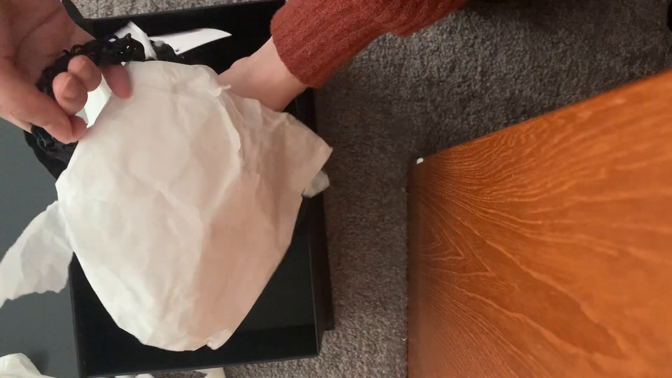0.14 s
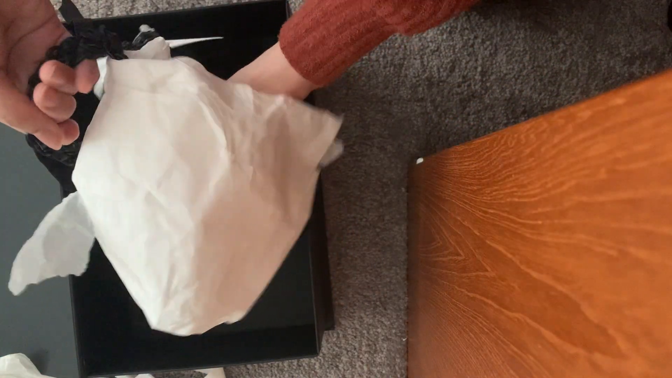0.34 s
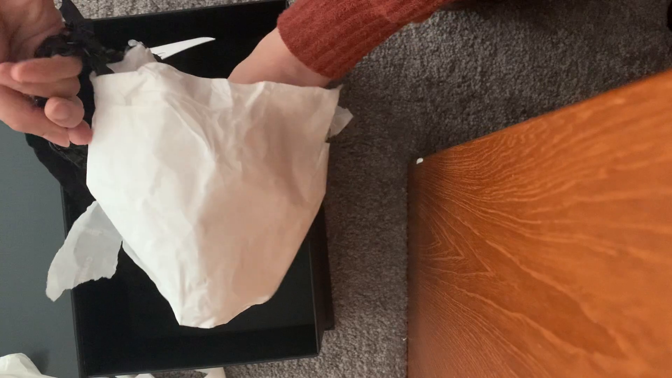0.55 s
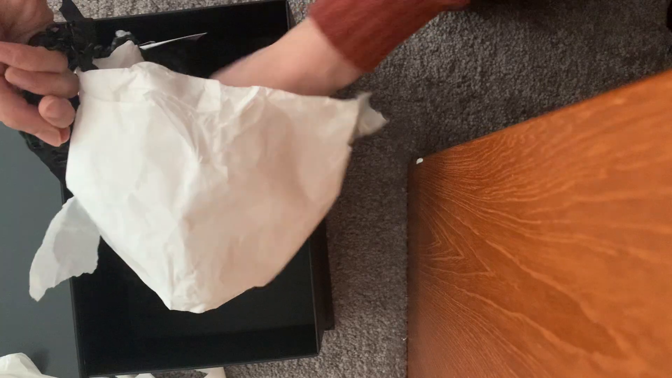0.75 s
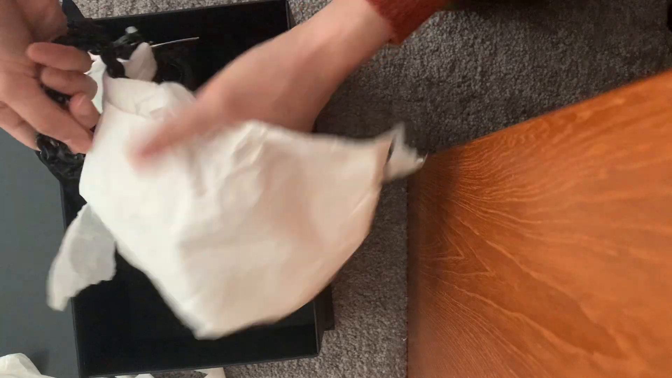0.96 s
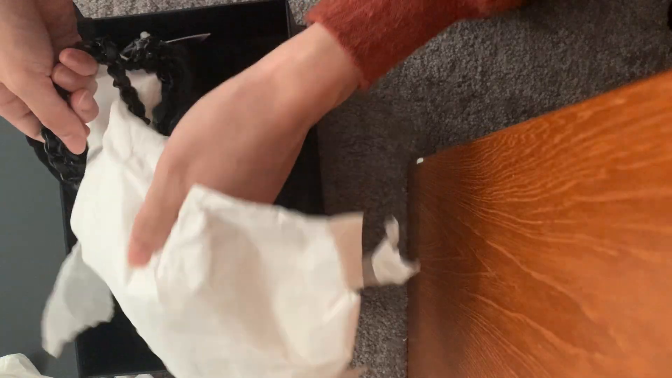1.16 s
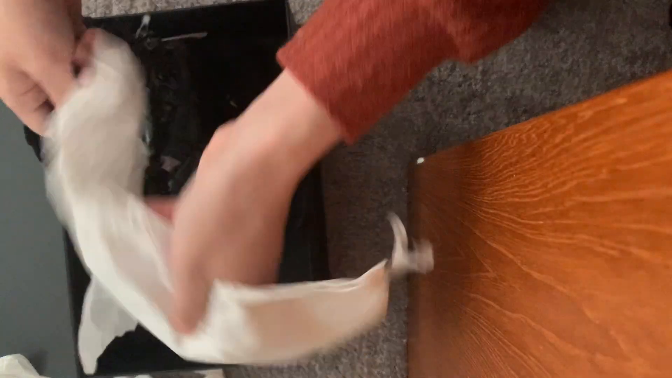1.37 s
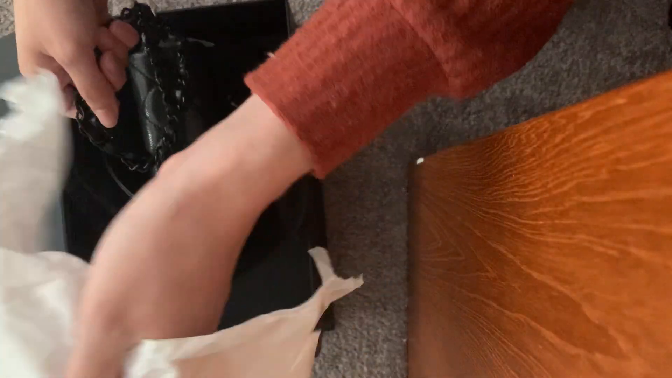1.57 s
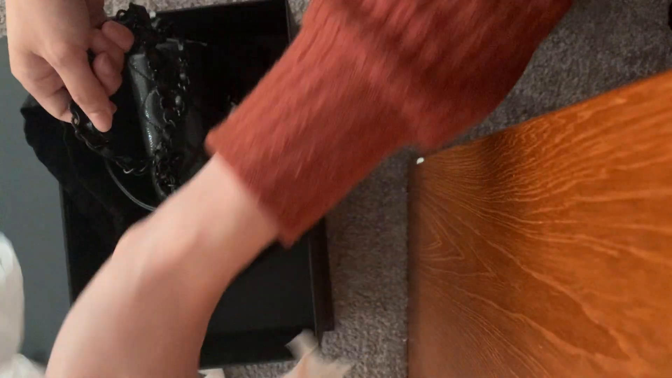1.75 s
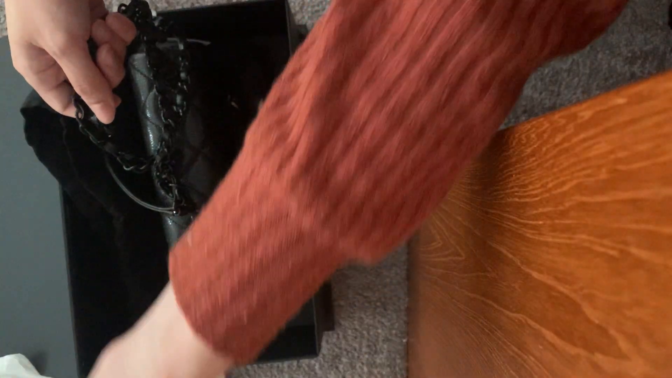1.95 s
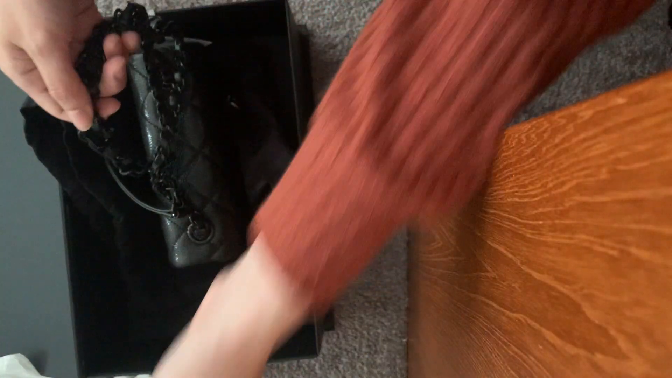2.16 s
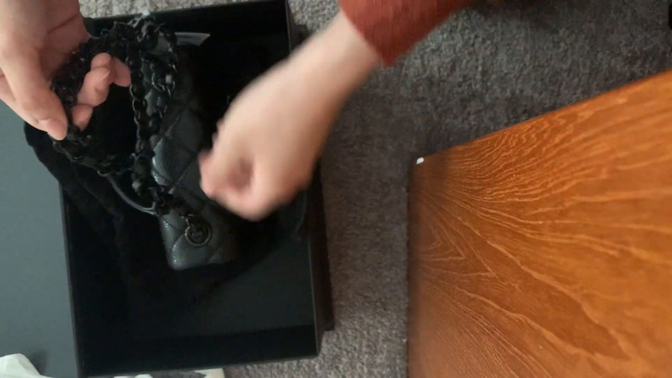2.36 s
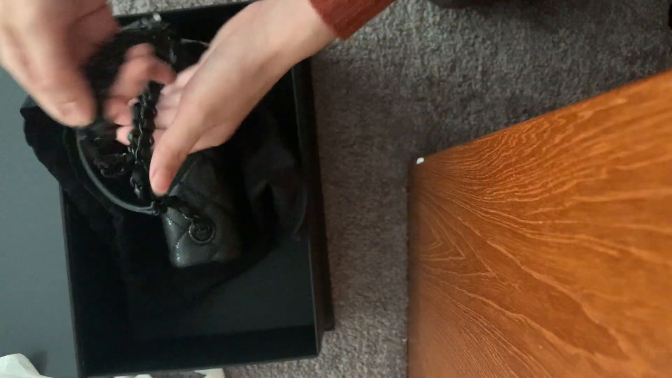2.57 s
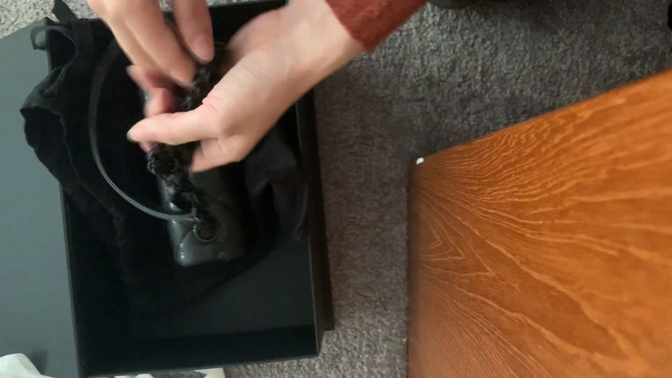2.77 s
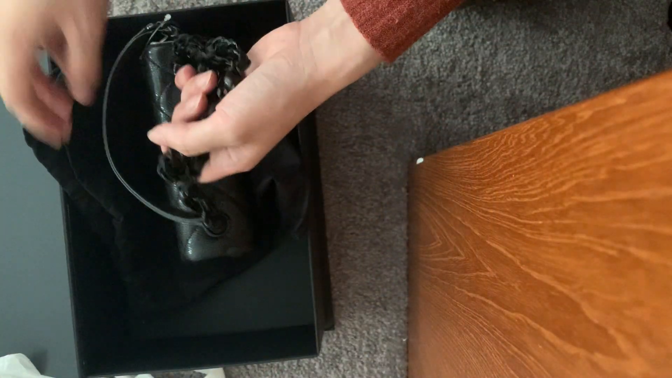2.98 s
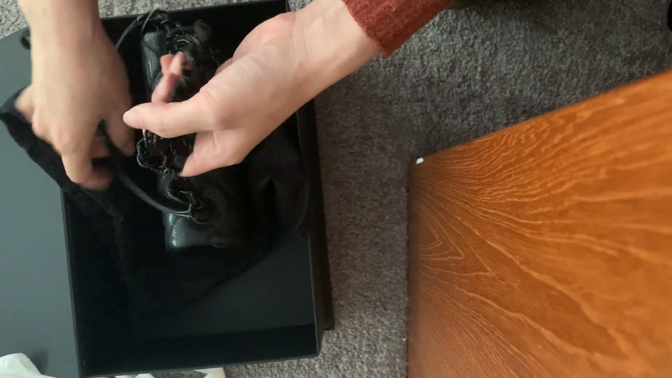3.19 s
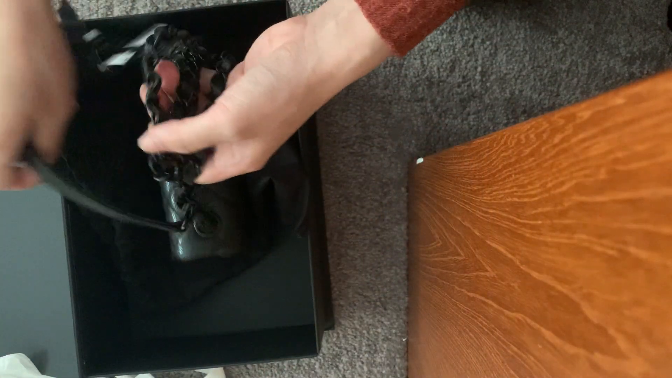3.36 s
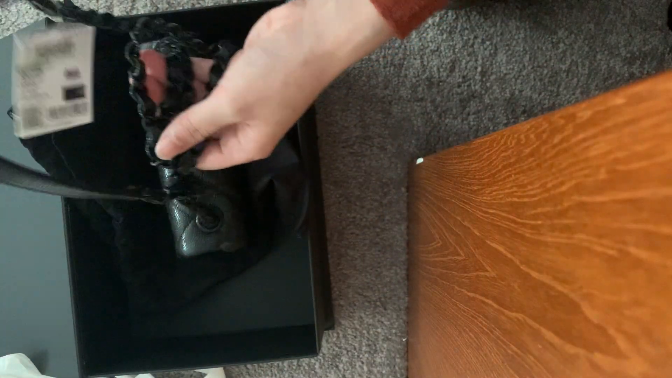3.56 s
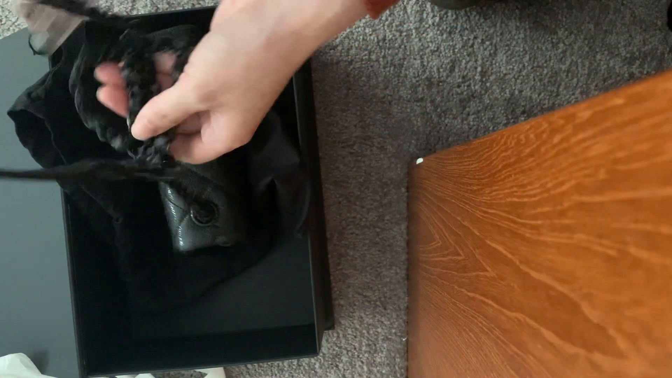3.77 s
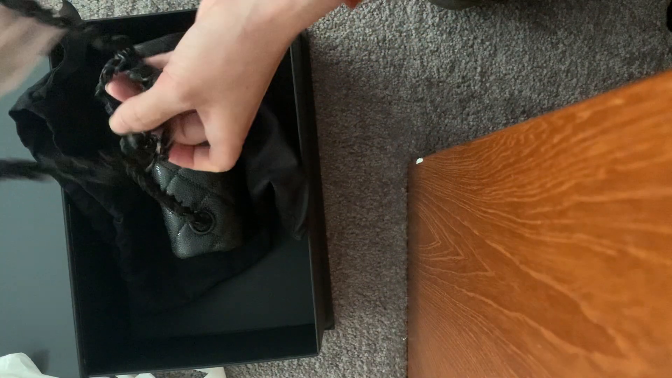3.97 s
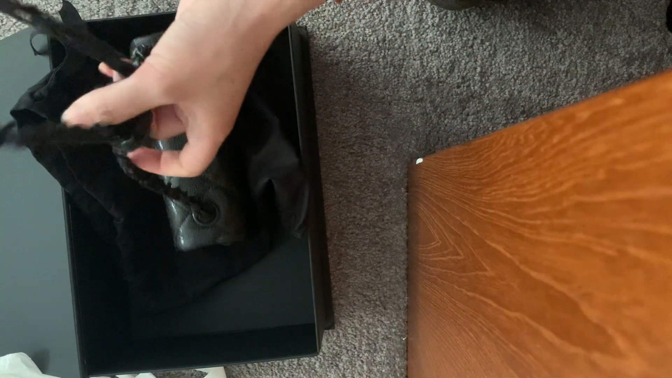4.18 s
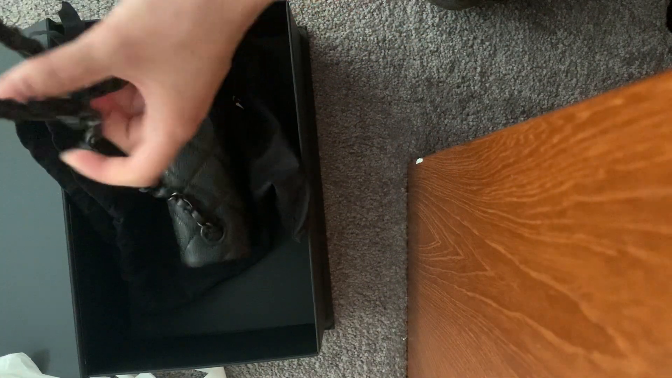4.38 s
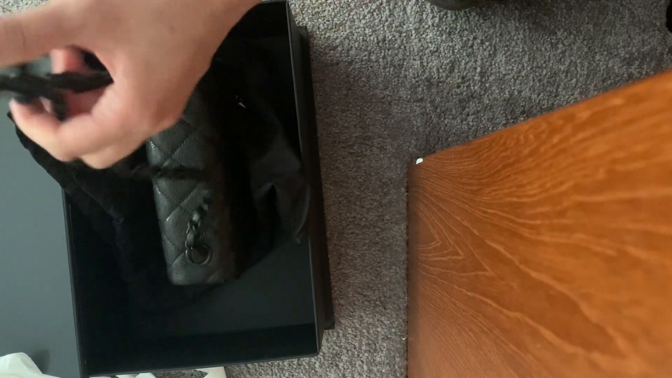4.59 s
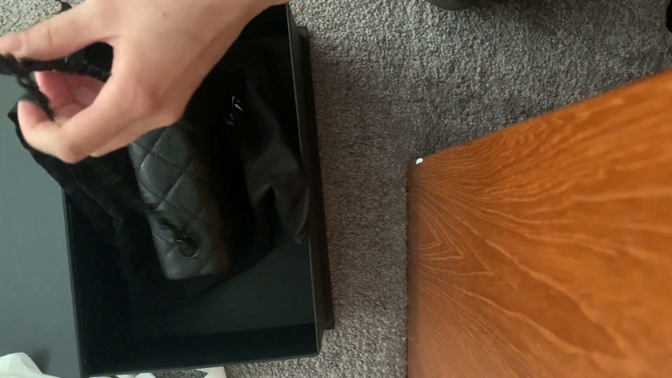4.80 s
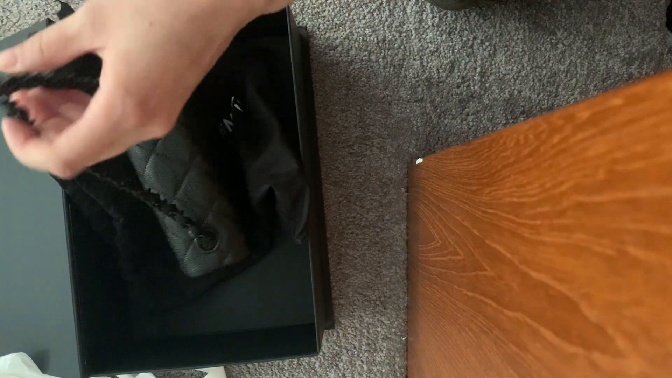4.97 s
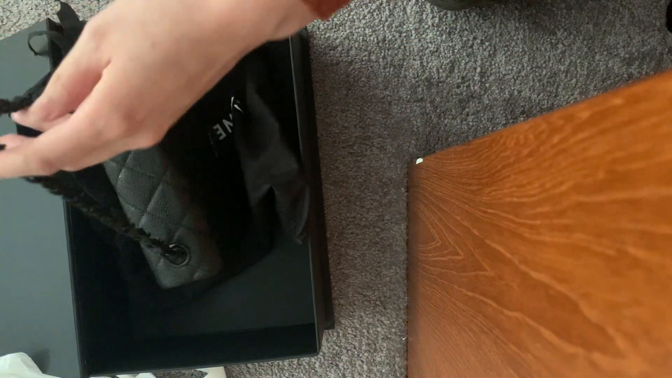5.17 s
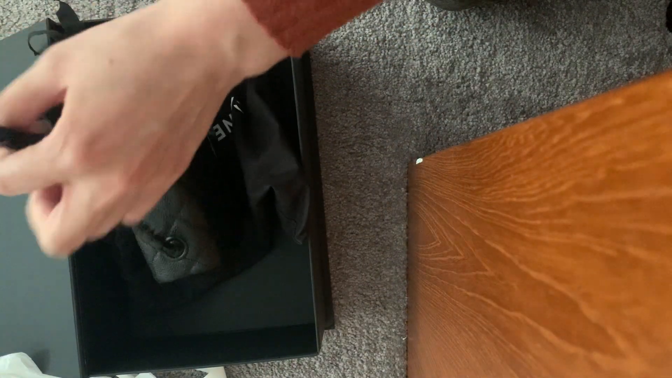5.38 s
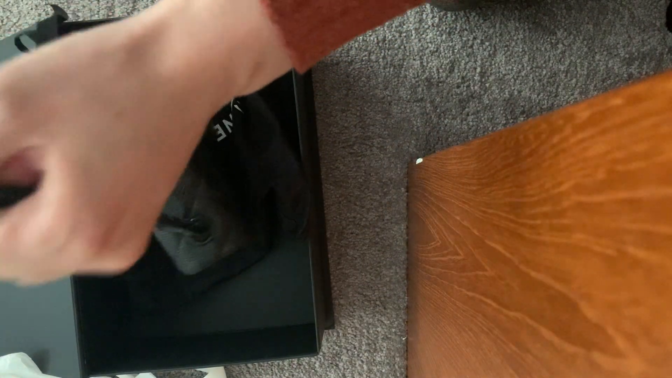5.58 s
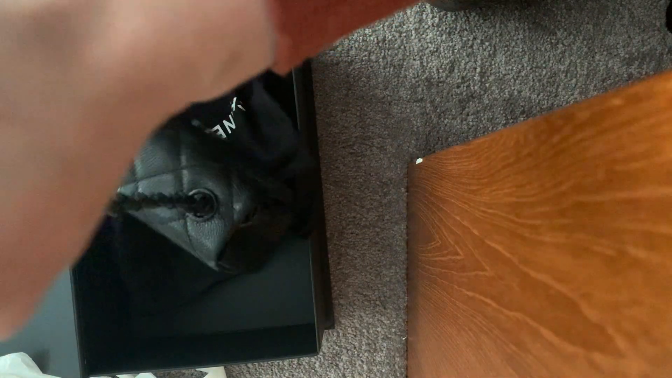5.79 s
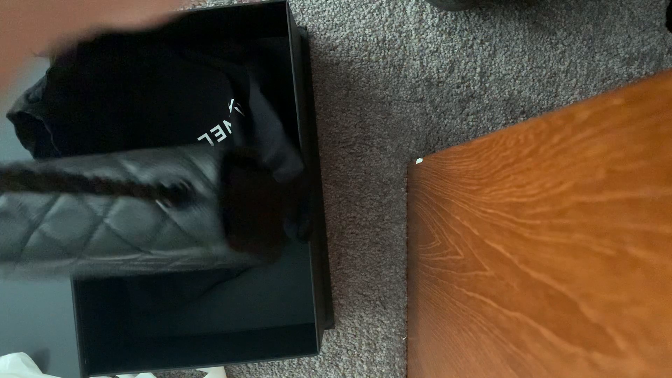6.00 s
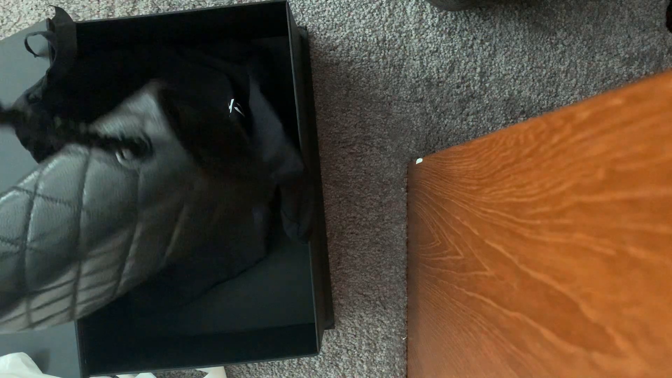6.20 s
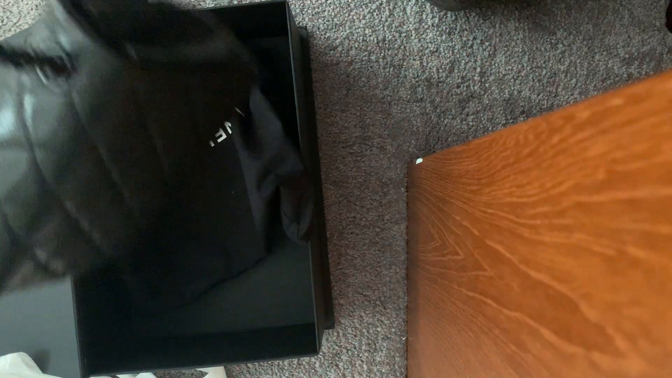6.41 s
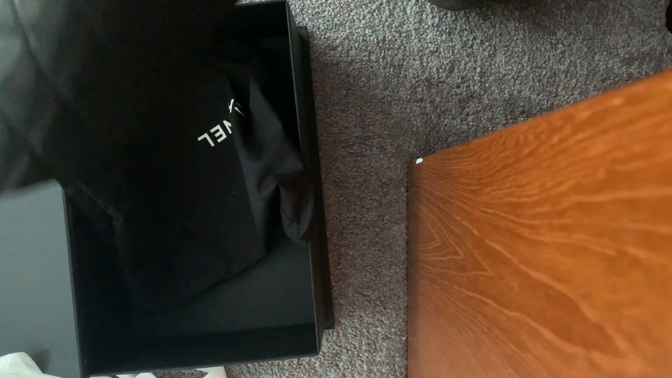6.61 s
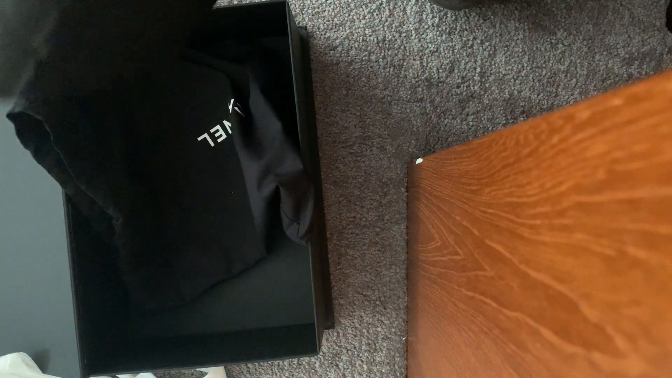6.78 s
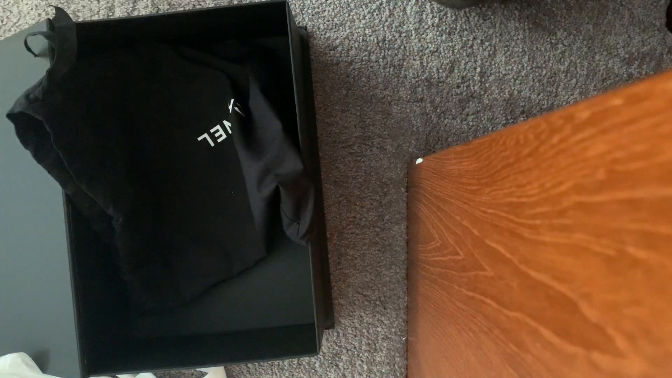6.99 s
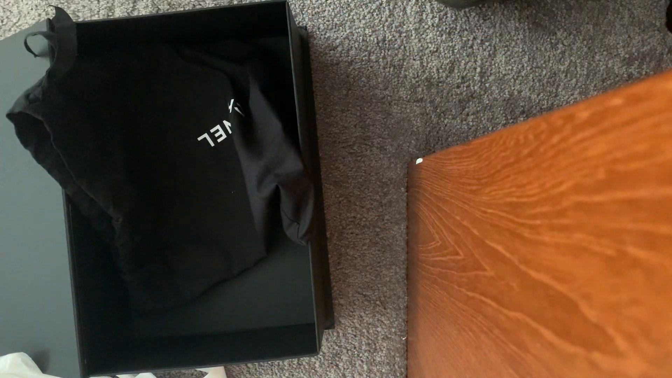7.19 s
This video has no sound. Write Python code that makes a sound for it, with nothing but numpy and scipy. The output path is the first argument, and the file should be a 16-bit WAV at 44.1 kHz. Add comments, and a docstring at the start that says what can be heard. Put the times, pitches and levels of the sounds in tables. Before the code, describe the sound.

Tissue paper crinkles off a handbag, then its chain strap clinks and the bag slides out of a cardboard box with soft knocks.

```python
"""Tissue paper is crumpled and pulled off a handbag in a cardboard box: its creases buckle in crackles
and snaps, its folds pop, and the freed sheet pushes puffs of air. Then the chain strap is gathered,
its links ringing as they collide; the bag slides out with a hiss of friction on cloth and knocks on
box and floor. Hands rub the leather and bump the box, and a sleeve scrapes along it. In the quiet
carpeted room a phone hears it: two spaced ports below 5.8 kHz, mainly one for both channels above."""
import sys
import numpy as np
from scipy import signal
from scipy.fft import rfft, irfft, next_fast_len
from scipy.io import wavfile
from scipy.ndimage import uniform_filter1d

SR = 44100
rng = np.random.default_rng(int(sys.argv[2]) if len(sys.argv) > 2 else 0)


def file_out(sig):
    """Save sig as 16-bit WAV at sys.argv[1]."""
    # one column per channel
    cols = np.atleast_2d(sig).T
    # limit, then scale
    lim = np.clip(cols, -1, 1)
    pcm = np.round(lim * 32767).astype(np.int16)
    wavfile.write(sys.argv[1], SR, pcm)


N = 319725

# spectrum of fine crackle: f/Hz, level/dB
CRACKLE_SPECTRUM = [(4500, 1), (5500, -15), (6500, -3.5), (8000, 6), (10000, 2), (12300, 1.5), (14500, 0),
                    (15900, 4.5)]
# spectrum of the whole sheet in motion: f/Hz, level/dB
SHEET_SPECTRUM = [(500, -11), (800, -5.5), (1500, -0.5), (2100, -2.5), (2700, -4), (3200, -7), (4000, -5),
                  (5500, -4.5), (7000, -11)]
# collisions of chain links: t/s, level/dB, share of the top mode/dB
LINK_TOUCHES = [(2.623, -46, -2), (2.651, -54, -7), (2.7342, -45.5, 0), (2.7561, -37, -11),
                (2.764, -45, -14), (2.777, -47, -22), (2.7849, -41, -9), (2.811, -51, -6),
                (2.8167, -48, -4), (2.846, -45, -6), (2.855, -50, -8), (2.886, -56, -10), (3.0316, -50, -9),
                (3.111, -54, -8), (3.123, -52, -5), (3.129, -55, -8), (3.1556, -43, -11), (3.212, -59, -12),
                (3.2501, -46.5, -12), (3.3869, -53, -23), (3.55, -48.5, -10), (3.5585, -49, -13),
                (3.5652, -44, -3), (3.5693, -33.5, -6), (3.6006, -35, -10), (3.6128, -44, -14),
                (3.643, -33, -3.5), (3.656, -41, -4), (3.669, -41, -15), (3.751, -46, 5), (3.766, -49, -7),
                (3.772, -43, -22), (3.802, -41, -4), (3.8145, -38.5, -3), (3.823, -40, -7),
                (3.841, -34, -7.5), (3.908, -35, -5), (3.933, -43.5, -3), (3.957, -43, -7),
                (3.964, -34.5, -5), (3.9972, -35, 1), (4.009, -38, -11), (4.015, -44, -2),
                (4.024, -35.5, -3), (4.0306, -37, -9), (4.047, -41, 1), (4.055, -42, -11),
                (4.07, -37.5, -16), (4.074, -35, -1), (4.1007, -29, -2), (4.1161, -35.5, -25),
                (4.167, -36, -2.5), (4.169, -41, -3), (4.199, -40, -10), (4.207, -33, 3.5),
                (4.2117, -33, -2.5), (4.223, -50, -2), (4.235, -33, -9), (4.2415, -36, -3),
                (4.247, -27.5, 0), (4.2534, -28, -2), (4.272, -40, -10), (4.2791, -40, -6),
                (4.307, -47.5, -12), (4.457, -55.5, -31.5), (4.634, -55, 4.5), (4.646, -52.5, 4),
                (4.6634, -48, -5), (4.679, -49, -4), (4.692, -53, 0), (4.7071, -32.5, -2),
                (4.717, -38, -10), (4.722, -33, -1), (4.749, -32, -3), (4.7912, -32, -3.5),
                (4.7945, -37, -16), (4.821, -48, -2), (4.9576, -40.5, -9), (5.4843, -44, -7),
                (5.5172, -48.5, -18), (5.636, -38.5, -5), (5.725, -31, -4.5), (5.7957, -37, -5.5),
                (5.803, -38, -7), (5.94, -42, -0.5), (5.956, -39.5, -13), (6.0937, -43.5, -3),
                (6.0976, -30.5, 0), (6.1729, -40, -17.5)]


def paper_drive():
    """Power laws tie the gains of sheet and flap to the crackle; separate rustles lay the sheet aside."""
    # the sheet is worked and torn free: t/s, crackle level/dB
    working = [(0.0, -41.5), (0.11, -39.5), (0.14, -41.5), (0.24, -44), (0.31, -38.5), (0.39, -42.5),
               (0.48, -39.5), (0.57, -40.5), (0.66, -51), (0.76, -42.5), (0.82, -53), (1.02, -48.5),
               (1.05, -39.5), (1.394, -37.5), (1.418, -26.5), (1.446, -33.5), (1.492, -39), (1.532, -40),
               (1.562, -38.5), (1.63, -49.5)]
    # t/s, duration/s, crackle level/dB, sheet level/dB, flap level/dB
    rustles = [(1.629, 0.23, -54, -55.5, -61), (1.9, 0.011, -59, -57.5, -67.5),
               (1.962, 0.27, -63.5, -62.5, -81), (2.029, 0.06, -49, -55.5, -66.5),
               (2.12, 0.0079, -43.5, -54.5, -75), (2.271, 0.036, -47.5, -51, -67),
               (2.346, 0.07, -47.5, -49, -62.5), (2.49, 0.063, -64, -85, -73),
               (2.774, 0.049, -58.5, -72, -91), (3.237, 0.053, -73, -71, -76),
               (3.367, 0.042, -64, -75.5, -77)]
    crackle, = gain_curves(working)
    grip = crackle / amp(-40)   # 1 at a firm grip
    worked = (crackle, amp(-43) * grip ** 1.024, amp(-52.5) * grip ** 1.73)
    start, length, *levels = np.transpose(rustles)
    return [np.maximum(gain, swells(start, length, db, rise=760, fall=420))
            for gain, db in zip(worked, levels)]


def paper_crumpling():
    """Buckling at three spots: small creases radiate treble, larger ones also move the whole sheet."""
    panel_hz = np.array([950, 1500, 2200, 2650, 3600])
    crackle_gain, sheet_gain, flap_gain = paper_drive()
    busy = np.clip(crackle_gain / amp(-40), .03, 6) ** .5   # gentle handling leaves few creases
    out = 0
    for lag in (12, 16, 21):
        fine = grains(700 * busy, spread_db=3.8, clump_db=3, t60=.003, bed=.9 * busy) / busy ** .4
        large = grains(250 * busy, spread_db=3, clump_db=3.5, t60=.012, bed=1) / busy ** .55
        coarse = .5 * fine + large
        noise = rng.standard_normal(N)
        crackle = waver(unit_rms(colour(fine * noise, CRACKLE_SPECTRUM)), 7684, 7800, swing_db=-1.5)
        sheet = unit_rms(colour(coarse * noise, SHEET_SPECTRUM))
        for hz in panel_hz * rng.uniform(.92, 1.08, len(panel_hz)):   # panels sing out in turn
            sheet = waver(sheet, .93 * hz, 1.07 * hz, swing_db=4.5)
        # low thump of the flapping sheet: f/Hz, level/dB
        flap_spectrum = [(40, -15.5), (60, -11.5), (120, -5.5), (210, 0.5), (300, 1.5), (420, -5),
                         (600, -6), (900, -34)]
        flap = unit_rms(colour(coarse * noise, flap_spectrum))
        out += ports(crackle_gain * crackle + sheet_gain * unit_rms(sheet), lag)
        out += ports(flap_gain * flap, lag / 2)
    return out / np.sqrt(3)


def crease_snaps():
    """Sudden buckling of a single crease releases a short noise burst, coloured by the sheet."""
    # t/s, level/dB
    snaps = [(0.036, -19.5), (0.092, -21), (0.2585, -29), (0.372, -32), (0.496, -27), (0.6645, -35),
             (0.6843, -24.5), (0.7848, -29), (0.8328, -32), (0.841, -31.5), (0.8754, -26), (0.9137, -34),
             (0.943, -34), (0.962, -31), (0.969, -25), (0.995, -33), (1.003, -32), (1.038, -30),
             (1.063, -21), (1.111, -34), (1.2161, -46), (1.3685, -31), (1.394, -18), (1.4125, -25),
             (1.5618, -42), (1.574, -30), (1.752, -28), (1.847, -31), (1.914, -39.5), (2.047, -24.5),
             (2.2716, -29), (2.3155, -28.5), (2.344, -41), (2.37, -24)]
    times, level_db = np.transpose(snaps)
    bursts = rng.choice([-1., 1.], N) * decay(impulses(times, amp(level_db)), t60=.007)
    return ports(amp(-3) * colour(bursts, CRACKLE_SPECTRUM) + amp(-8) * colour(bursts, SHEET_SPECTRUM), 19)


def fold_pops():
    """Snap-through of a fold excites the low modes of the bunched paper."""
    # t/s, level/dB, relative thud level/dB, relative edge level/dB
    pops = [(0.04, -39, -16, -17), (0.409, -23.5, -27, -36), (0.474, -22, -20, -36), (0.507, -45, -37, -13),
            (0.542, -38, -35, -8), (0.683, -33, -25, -11.5), (0.754, -39, -30, -20), (0.787, -35, -39, -20),
            (0.873, -60.5, 0.5, 18.5), (1.037, -27.5, -20, -24), (1.062, -28.5, -15.5, -30),
            (1.195, -49, -15.5, -11), (1.416, -37, -28, -8), (1.59, -36.5, -10.5, -5),
            (2.274, -45, -16, 7.5), (2.377, -38, -18, -20)]
    # f/Hz, level/dB, T60/s
    paper_modes = [(210.6, 7, 0.049), (377.3, 14, 0.023)]
    return impacts(pops, paper_modes, lag=5.7)


def air_puffs():
    """The fluttering sheet displaces air, which reaches the phone as gusts of low noise."""
    # t/s, duration/s, level/dB
    puffs = [(1.466, .012, -46.5), (1.48, 0.03, -55), (1.537, 0.019, -49.5)]
    air = band(band(rng.standard_normal(N), 40.2, 142), 40.2, 142)
    return swells(*np.transpose(puffs), rise=690, fall=260) * unit_rms(air)


def chain_ticks():
    """Colliding links share their energy between a broad rattle and a top mode; lower modes clink."""
    # f/Hz, level/dB
    rattle_spectrum = [(5500, -10), (6500, -5.5), (8500, -0.5), (10000, 1.5), (12000, 2), (13500, -17),
                       (16000, -12)]
    # modes of links and clasp: f/Hz, level/dB, T60/s
    clink_modes = [(2590, -52.5, 0.013), (3660, -57, 0.032), (4520, -28.5, 0.0062), (10150, -38.5, 0.023)]
    times, touch_db, share_db = np.transpose(LINK_TOUCHES)
    share = np.clip(amp(share_db), 0, .95)
    noise = rng.choice([-1., 1.], N)

    def bursts(gains):
        """The contact force holds for about 2 ms, then decays."""
        held = signal.lfilter(np.ones(80), [1], impulses(times, amp(touch_db) * gains))
        return noise * (signal.lfilter([.07], [1, -.93], held) + .003 * decay(held, .02))

    broad, bright = bursts(np.sqrt(1 - share ** 2)), bursts(share)
    rattle = amp(3.5) * colour(broad, rattle_spectrum) + amp(-16.5) * band(broad, 3320, 3500)
    top = amp(-45) * ring(bright, hz=14550, t60=.033) + amp(11) * band(bright, 13500, 17000)
    strengths = amp(4 * rng.standard_normal((len(times), len(clink_modes))))   # per touch and mode
    clink = sum(amp(db) * ring(bursts(strength), hz, t60)
                for strength, (hz, db, t60) in zip(strengths.T, clink_modes))
    return ports(rattle + clink + top, 15)


def chain_jingle():
    """Tiny collisions of loose links surround each touch of the chain and grow with its strength."""
    times, touch_db, _ = np.transpose(LINK_TOUCHES)
    gain = swells(times, 0, -59 + .49 * (touch_db + 40), rise=2800, fall=350)
    links = grains(370, spread_db=2.5, clump_db=5.5, t60=.002, bed=.75) * rng.standard_normal(N)
    return ports(gain * unit_rms(colour(links, CRACKLE_SPECTRUM)), 14.1)


def bag_knocks():
    """Impacts of the bag on box and floor excite damped low modes."""
    # t/s, level/dB, relative thud level/dB, relative edge level/dB
    knocks = [(2.854, -47.5, -9, -9), (3.192, -38.5, -27, -15), (3.386, -48.5, -12, -14.5),
              (4.459, -47, -6.5, -13.5), (4.531, -47.5, -3.5, -39), (4.993, -47, -10, -28),
              (5.052, -49.5, -10.5, -29), (5.83, -29.5, -13.5, -18.5), (5.864, -41, -11.5, -34),
              (5.91, -51, -7.5, -14), (6.204, -43, -41, -9.5), (6.207, -30, -12, -23.5),
              (6.218, -43, -4, -21), (6.344, -55, -21, 1), (6.356, -30, -11.5, -7.5),
              (6.425, -43.5, -17, -12), (6.468, -34.5, -15, -47), (6.546, -60.5, -13.5, -1),
              (6.854, -57.5, -12, 3.5), (6.887, -38, -10, -22), (6.952, -47, -10, -22),
              (7.04, -46.5, -0.5, -25), (7.155, -38, -1, -21.5)]
    # f/Hz, level/dB, T60/s
    box_modes = [(123, -31, 0.57), (242, -13, 0.12), (386, 0, 0.024), (538, 14.5, 0.0197), (653, -7, 0.051)]
    return impacts(knocks, box_modes, lag=19)


def bag_slide():
    """Sliding friction on cloth hisses; each band swells and fades as the contact patch moves."""
    # t/s, swish level/dB, level of the bands above 12 kHz/dB
    sliding = [(5.45, -89.5, -83), (5.53, -69, -82), (5.58, -53.5, -72), (5.64, -62, -62), (5.76, -69, -71),
               (5.82, -61, -64), (5.87, -64.5, -65), (5.97, -55.5, -58), (6.08, -57.5, -58.5),
               (6.35, -86.5, -81), (6.42, -100, -100)]
    swish, top = gain_curves(sliding)
    out = 0
    for low_hz in range(4000, 16000, 1000):
        rolloff_db = max(-4 * abs(low_hz - 9500) / 1000, -19)
        gain = swish * amp(rolloff_db) if low_hz < 12000 else top
        flicker = amp(2.5 * drift(7))
        out += gain * flicker * unit_rms(band(rng.standard_normal(N), low_hz, low_hz + 1000))
    return ports(out, 22)


def box_bumps():
    """Resonance of the box: each soft push sets a hollow note and its overtone swelling and dying."""
    # t/s, level/dB, f/Hz
    bumps = [(0.035, -40, 361), (2.858, -49, 198), (2.929, -54.5, 195), (3.368, -59, 218), (3.57, -52, 219),
             (3.603, -49.5, 140), (3.651, -60, 196), (3.771, -51, 130), (3.815, -47.5, 131),
             (3.84, -56, 260), (3.894, -61, 191), (3.93, -53, 206), (3.969, -53.5, 195), (4.031, -57, 183),
             (4.714, -53.5, 199), (4.796, -53.5, 201), (6.211, -47.5, 332), (7.157, -47.5, 281)]
    rise_s, t60 = .0034, .055
    out, t = np.zeros(N + SR), np.arange(int(.15 * SR)) / SR
    for start, db, hz in bumps:
        envelope = amp(db + 6.5 - 60 * t / t60) * (1 - np.exp(-t / rise_s))
        phase = 2 * np.pi * hz * t
        out[int(start * SR):][:len(t)] += envelope * (np.sin(phase) + .31 * np.sin(1.7 * phase))
    return ports(out[:N], 8)


def leather_handling():
    """Friction of hands on leather comes in soft grains and shakes the box into a rumble."""
    # shifts of grip: t/s, duration/s, rub level/dB, rumble level/dB
    grips = [(2.466, 0.037, -68.5, -87), (2.859, 0.0073, -74, -66), (2.919, 0.011, -93, -68),
             (3.158, 0.038, -72, -70.5), (3.379, 0.016, -71.5, -69.5), (3.559, 0.1, -73.5, -71.5),
             (3.774, 0.11, -70, -67), (3.902, 0.22, -71.5, -70), (4.169, 0.11, -69.5, -70),
             (4.425, 0.052, -81, -76), (4.521, 0.017, -77.5, -71.5), (4.73, 0.02, -96, -76),
             (4.763, 0.011, -76, -69), (4.969, 0.022, -76, -68.5), (5.255, 0.1, -88.5, -68.5),
             (5.501, 0.15, -74.5, -66.5), (5.655, 0.074, -69.5, -63.5), (5.762, 0.06, -67, -62),
             (5.896, 0.018, -79, -69), (6.214, 0.022, -70, -68), (6.354, 0.017, -78, -80),
             (6.468, 0.047, -77, -67), (6.829, 0.076, -71.5, -88), (6.9, 0.021, -70.5, -68.5),
             (7.028, .02, -80, -76), (7.142, 0.074, -77, -71.5)]
    # f/Hz, level/dB
    leather_spectrum = [(400, -12), (600, -4), (900, 3.5), (1400, 4.5), (2400, 4), (3200, 0), (4500, 0),
                        (6500, -7.5)]
    # f/Hz, level/dB
    rumble_spectrum = [(40, -15), (60, 2.5), (110, -3.5), (210, 0.5), (300, -5.5), (450, -13), (700, -11.5)]
    start, length, rub_db, rumble_db = np.transpose(grips)
    held = np.arange(N) > 2.1 * SR   # once the hands reach the strap, some sound lasts between grips
    rub_gain = swells(start, length, rub_db, rise=530, fall=240) + held * amp(-83)
    rumble_gain = swells(start, length, rumble_db, rise=530, fall=240) + held * amp(-78)
    rub = 0
    for lag in (13, 22):
        friction = grains(300, spread_db=0, clump_db=4.5, t60=.041, bed=.25) * rng.standard_normal(N)
        rub += ports(rub_gain * unit_rms(colour(friction, leather_spectrum)), lag)
    rumble = amp(1.9 * drift(20)) * unit_rms(colour(rng.standard_normal(N), rumble_spectrum))
    return rub + ports(rumble_gain * rumble, 14.1)


def sleeve_scrapes():
    """Friction of a knitted sleeve along the box makes coarse grains of midrange noise."""
    # t/s, duration/s, level/dB
    scrapes = [(1.975, 0.11, -65.5), (2.355, 0.066, -56.5), (2.476, 0.0059, -64)]
    drag = grains(500, spread_db=-1, clump_db=4.5, t60=.012, bed=.3) * rng.standard_normal(N)
    gain = swells(*np.transpose(scrapes), rise=360, fall=650)
    return ports(gain * unit_rms(band(drag, 437, 1230)), 14)


def reverberation(x, t60=.2):
    """A diffuse field, partly alike in both ports; absorption damps the treble twice as fast."""
    t = np.arange(int(.4 * SR)) / SR
    white = rng.standard_normal((3, len(t)))
    white = .85 * white[0] + .5 * white[1:]
    dull = signal.lfilter([.3], [1, -.7], white)
    tail = (dull * amp(-60 * t / t60) + (white - dull) * amp(-120 * t / t60)) * (t > .003)
    tail /= np.sqrt(np.sum(tail ** 2, axis=1, keepdims=True))
    return signal.fftconvolve(x, tail, axes=1)[:, :N]


def noise_floor():
    """Broadband noise, weakly correlated between the ports, and a wavering narrow-band appliance hum."""
    # room air and preamplifier: f/Hz, level/dB
    floor_spectrum = [(30, -9), (50, 13.5), (120, -11.5), (250, -21), (500, -12.5), (1000, -14.5),
                      (2200, -21.5), (4000, -39.5), (6500, -15.5), (10000, -18.5), (16000, -24.5)]
    common, left, right = (colour(white, floor_spectrum) for white in rng.standard_normal((3, N)))
    air = unit_rms(.27 * ports(common, 7.1) + 1.2 * np.array([left, right]))
    hum = unit_rms(band(rng.standard_normal(N), 105.5, 127.5))
    return amp(-73.5) * (air + hum)


def impacts(rows, modes, lag):
    """Impulse response of a struck body: a sharp contact, then ringing low modes."""
    times, db, thud_db, edge_db = np.transpose(rows)
    hit, thud, edge = (impulses(times, amp(db + extra)) for extra in (0, thud_db, edge_db))
    rough = rng.standard_normal(N)
    contact = band(hit + .1 * rough * decay(hit, .006), 400, 2900)
    click = amp(14) * butterworth(contact, 2, 3200, "low")
    click -= amp(23) * band(edge + .26 * rough * decay(edge, .009), 2900, 6500)
    click += amp(2) * ring(edge, hz=3700, t60=.015)
    push = butterworth(thud, 2, 450, "low")
    low = sum(amp(mode_db - 7) * ring(push, hz, t60) for hz, mode_db, t60 in modes)
    return ports(click + low, lag)


def grains(per_s, spread_db, clump_db, t60, bed):
    """Shot-noise envelope: tiny bursts arrive in clumps over a smooth bed."""
    sizes = amp(spread_db * np.minimum(rng.exponential(1, N), 3))
    born = rng.random(N) < per_s * amp(clump_db * drift(35)) / SR
    return unit_rms(unit_rms(decay(sizes * born, t60)) + bed)


def swells(start, length, level_db, rise, fall):
    """Gain of the loudest swell at each sample; each holds between a rise and a fall given in dB/s."""
    t = np.arange(0, N + 64, 64) / SR
    early = np.maximum(start[:, None] - t, 0)
    late = np.maximum(t - (start + length)[:, None], 0)
    loudest_db = np.max(level_db[:, None] - rise * early - fall * late, axis=0)
    return amp(np.interp(np.arange(N) / SR, t, loudest_db))


def gain_curves(rows):
    """Levels interpolated in dB give a gain at every sample, silent outside their span."""
    times, *levels = np.transpose(rows)
    return [amp(np.interp(np.arange(N) / SR, times, db, left=-140, right=-140)) for db in levels]


def waver(x, low_hz, high_hz, swing_db):
    """Random amplitude modulation of one band, as the sheet turns and folds."""
    return x + (amp(swing_db * drift(17)) - 1) * band(x, low_hz, high_hz)


def drift(rate_hz):
    """Low-passed noise: a slow random fluctuation of unit rms."""
    r = np.exp(-2 * np.pi * rate_hz / SR)
    return unit_rms(signal.lfilter([1], [1, -2 * r, r * r], rng.standard_normal(N + 9000))[9000:])


def colour(x, spectrum):
    """A minimum-phase filter imposes the spectrum causally, so nothing sounds early."""
    size = 8192
    hz = np.arange(size // 2 + 1) * SR / size
    point_hz, point_db = np.transpose(spectrum)
    db = np.interp(np.log(hz + 1), np.log(point_hz), point_db, left=-50, right=-50)
    cepstrum = irfft(uniform_filter1d(np.log(amp(db)), size=5), size)
    cepstrum[1:size // 2] *= 2
    cepstrum[size // 2 + 1:] = 0
    return signal.oaconvolve(x, irfft(np.exp(rfft(cepstrum)), size))[:N]


def impulses(times, gains):
    """An impulse train with one gain per time."""
    out = np.zeros(N)
    np.add.at(out, np.round(times * SR).astype(int), gains)
    return out


def decay(clicks, t60):
    """Each impulse starts an exponential decay."""
    return signal.lfilter([1], [1, -amp(-60 / (t60 * SR))], clicks + 1e-18)


def ring(force, hz, t60):
    """A damped oscillator: a unit impulse starts a sine of height 1."""
    r, w = amp(-60 / (t60 * SR)), 2 * np.pi * hz / SR
    return signal.lfilter([0, np.sin(w)], [1, -2 * r * np.cos(w), r * r], force + 1e-18)


def ports(x, lag):
    """Path difference: sound reaches the farther, right port lag samples later."""
    return np.array([x, np.interp(np.arange(N) - lag, np.arange(N), x)])


def delay(x, lag):
    """A linear phase shift delays x by a fractional number of samples."""
    size = next_fast_len(N + 256)
    shift = np.exp(-2j * np.pi * np.arange(size // 2 + 1) * lag / size)
    return irfft(rfft(x, size) * shift, size)[..., :N]


def butterworth(x, order, hz, kind):
    """A filter with a maximally flat passband."""
    return signal.sosfilt(signal.butter(order, hz, kind, fs=SR, output="sos"), x)


def band(x, low_hz, high_hz):
    """Band-pass with skirts of 12 dB per octave."""
    return butterworth(x, 2, [low_hz, high_hz], "band")


def amp(db):
    """Level in dB to amplitude ratio."""
    return 10 ** (np.asarray(db) / 20)


def unit_rms(x):
    """Scale to unit rms."""
    return x / np.sqrt(np.mean(x ** 2) + 1e-20)


def scene():
    """Superposition of direct sound, reverberation and the noise floor."""
    direct = paper_crumpling() + air_puffs() + crease_snaps() + fold_pops()
    direct += box_bumps() + sleeve_scrapes() + leather_handling() + chain_jingle()
    direct += bag_slide() + chain_ticks() + bag_knocks()
    return direct + amp(-15) * reverberation(direct) + noise_floor()


def record(dry):
    """The phone's crossover keeps both ports in the lows; the left port's treble feeds both channels."""
    crossover_hz, allpass_hz, cutoff_hz = 5800, 132.3, 16800
    lows = butterworth(dry, 6, crossover_hz, "low")
    lows -= np.array([[-.3], [.45]]) * band(lows, 500, 1100)   # left stronger, right weaker near 750 Hz
    treble, right_treble = butterworth(dry, 6, crossover_hz, "high")
    leak = .35 * delay(right_treble, 90)   # a little of the right port enters in antiphase
    mixed = lows + np.array([delay(treble, 9.5) + leak, treble - leak])
    mixed = butterworth(mixed, 4, 40, "high")
    # the group delay of six all-pass stages makes the bass arrive late
    b, a = signal.bilinear([1, -2 * np.pi * allpass_hz], [1, 2 * np.pi * allpass_hz], SR)
    for _ in range(6):
        mixed = signal.lfilter(-b, a, mixed)
    return signal.sosfilt(signal.cheby2(12, 70, cutoff_hz, fs=SR, output="sos"), mixed)


dry = scene()
out = record(dry)
file_out(out)
```